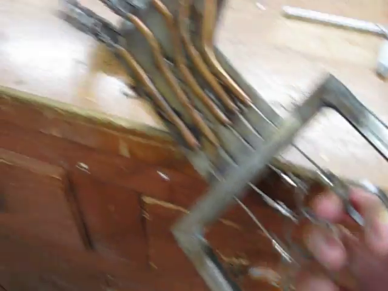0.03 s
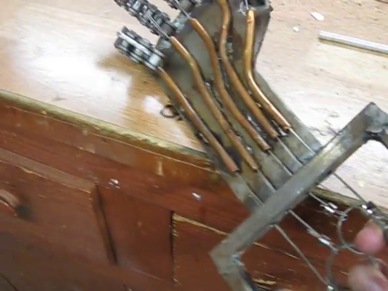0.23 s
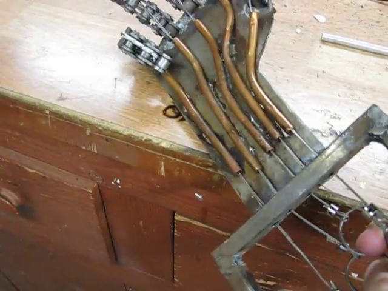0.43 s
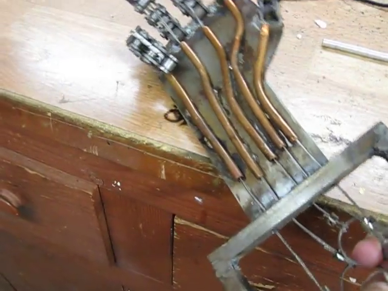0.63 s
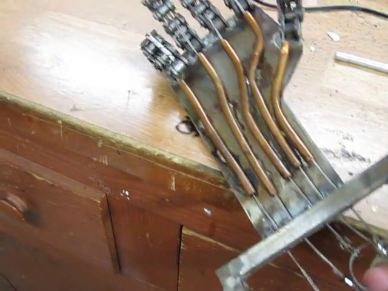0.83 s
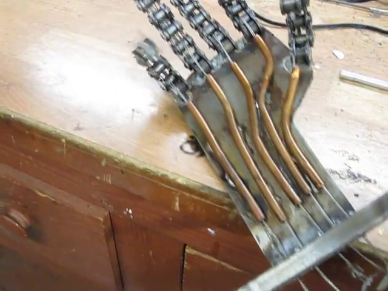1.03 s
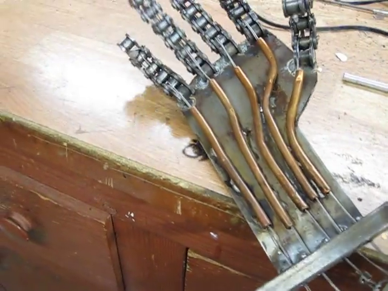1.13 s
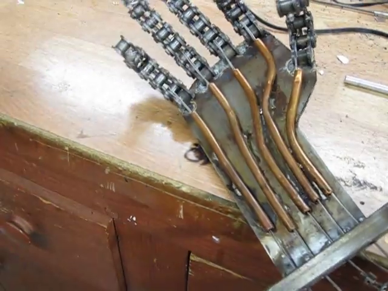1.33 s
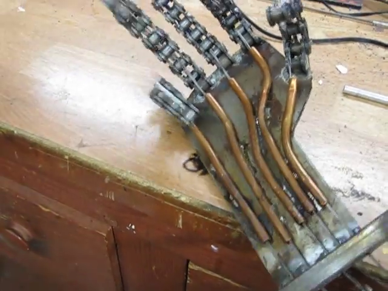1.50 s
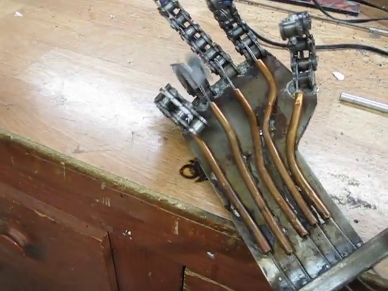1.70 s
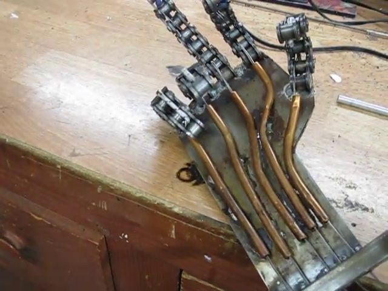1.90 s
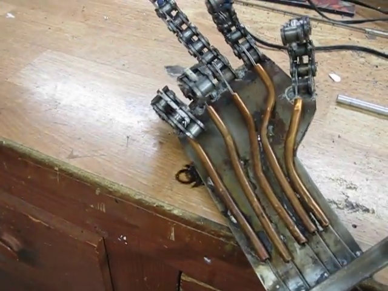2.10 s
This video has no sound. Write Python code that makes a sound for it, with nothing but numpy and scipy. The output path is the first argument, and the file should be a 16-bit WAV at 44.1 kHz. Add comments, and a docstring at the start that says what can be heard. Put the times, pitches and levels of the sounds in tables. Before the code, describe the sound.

Metal chain fingers of a mechanical hand snap sharply, then clack and tick as cables pull them. One drops on a wooden bench with a thump, followed by another ringing snap. Soft handling rumble, close by in a quiet room.

```python
"""Roller-chain fingers of a mechanical hand snap against their stops, ringing the steel hand.
Cables work them: each pull clacks on the steel frame, and the chains slide, tick and rasp.
One finger drops on the wooden bench below and makes it boom.
Handling rumbles softly underneath, in a quiet room."""
import sys
import numpy as np
from scipy import signal
from scipy.fft import rfft, irfft
from scipy.io import wavfile
from scipy.ndimage import uniform_filter1d

SR = 44100
rng = np.random.default_rng(int(sys.argv[2]) if len(sys.argv) > 2 else 0)


def unload_wav(signal):
    """Save mono or channel-first audio to the path in sys.argv[1] as 16-bit WAV at rate SR, clipped to [-1, 1]."""
    wavfile.write(
        sys.argv[1],
        SR,
        np.round(np.clip(np.atleast_2d(signal).T, -1, 1) * 32767).astype(np.int16),
    )


N = 94815
TIME = np.arange(N) / SR
RING_TIME = TIME[:SR // 2]
BASS_HZ, TREBLE_HZ = 910, 6070  # where the bass ends and the treble begins


def amp(db):
    """Turns decibels into a gain."""
    return 10 ** (np.asarray(db) / 20)

def unit(x):
    """Scales a sound to an average strength (rms) of 1."""
    return x / np.sqrt(np.mean(x ** 2) + 1e-20)

def read(points, hz):
    """Looks up a table's value at any frequency."""
    f, value = np.transpose(points)
    return np.interp(np.log(hz + 1), np.log(f), value)

def level(curve):
    """Turns rows of t/s, level/dB into a changing gain."""
    return amp(np.interp(TIME, *np.transpose(curve)))

def add(mix, s, sound):
    """Mixes a sound in at s seconds."""
    part = mix[max(round(s * SR), 0):][:len(sound)]
    part += sound[:len(part)]

def colour(x, points=(), bass_db=0, treble_db=0, peaks=(), size=8192):
    """Shapes the tone with a curve, bass and treble controls, and narrow peaks (f/Hz, height/dB)."""
    hz = abs(np.fft.fftfreq(size, 1 / SR))
    db = read(points, hz) if len(points) else 0
    db += bass_db / (1 + (hz / BASS_HZ) ** 2)
    db += treble_db * hz ** 2 / (hz ** 2 + TREBLE_HZ ** 2)
    for centre, height in peaks:
        octaves_away = np.log2((hz + 1) / centre)
        db += height / (1 + (octaves_away / 0.099) ** 2)
    response = np.exp(np.conj(signal.hilbert(np.log(amp(db)))))  # rings only after a hit
    taps = np.fft.ifft(response).real
    return signal.fftconvolve(x, taps[:size // 2])[:len(x)]

def noise(points):
    """Steady noise with the given tone."""
    return unit(colour(rng.standard_normal(N), points))

def fade(t60):
    """Dies away by 60 dB in t60 seconds, the fade time."""
    return np.exp(-np.log(1000) * RING_TIME / max(t60, .001))

def burst(t60):
    """Dense, quickly dying chatter, equally strong from low to high."""
    chatter = rng.choice([-1., 1.], len(RING_TIME)) * fade(t60)
    spectrum = rfft(chatter)
    bumps = np.sqrt(uniform_filter1d(abs(spectrum) ** 2, size=300) + 1e-12)
    even = irfft(spectrum / bumps, len(chatter)) * fade(10 * t60)
    return even / np.linalg.norm(even)

def grains(per_s, spread_db=6):
    """Tiny slips at random moments, a few of them large."""
    slips = (rng.random(N) < per_s / SR) * rng.choice([-1., 1.], N)
    return unit(slips * amp(spread_db * np.minimum(rng.exponential(1, N), 4)))

def ring(tones, bass_db=0, loose=True, rattle_hz=30, rattle_after_s=.008):
    """A struck part rings with its own tones; if it is loose, they soon waver and turn rough."""
    steps = rng.standard_normal((len(tones), len(RING_TIME))) * (RING_TIME > rattle_after_s)
    wander = loose * np.sqrt(2 * np.pi * rattle_hz / SR) * np.cumsum(steps, axis=1)
    out = np.zeros(len(RING_TIME))
    for k, (hz, db, t60) in enumerate(tones):
        sign = (-1) ** k if loose else 1
        gain = amp(db + bass_db / (1 + (hz / BASS_HZ) ** 2))
        out += sign * gain * fade(t60) * np.sin(2 * np.pi * hz * RING_TIME + wander[k])
    return out


# Tone of the handling rumble, the dragged-on bench and the air: f/Hz, level/dB
RUMBLE_TONE = [(15, 2), (45, 0), (80, -3.5), (250, -46)]
DRAG_TONE = [(40, -13.5), (95, -8.5), (138, -0.5), (185, -9), (300, -13.5), (1500, -52)]
AIR_TONE = [(18, -27.5), (30, -1.5), (106, -12), (461, -23), (800, -20), (1100, -28.5), (1960, -30),
            (4530, -44.5), (16000, -61.5)]
# How loud the handling and the dragging are: t/s, level/dB
RUMBLE_LEVELS = [(0, -44), (.075, -41.5), (.115, -63.5), (.6, -58), (.7, -52.5), (1.5, -51), (1.55, -70),
                 (2.15, -55)]
DRAG_LEVELS = [(0, -47), (.3, -65), (.72, -56.5), (.9, -51), (1.45, -49.5), (1.63, -61), (2.15, -61)]
def background(hum_hz=90.3, hum_start_s=1.69):
    """Handling rumbles, the bench murmurs as the hand drags, and a faint hum joins the room air."""
    rumble = noise(RUMBLE_TONE) * level(RUMBLE_LEVELS)
    drag = noise(DRAG_TONE) * level(DRAG_LEVELS)
    air = amp(-61) * noise(AIR_TONE)
    hum_fade_in = np.clip((TIME - hum_start_s) / 0.035, 0, 1)
    hum = amp(-58) * hum_fade_in * np.sin(2 * np.pi * hum_hz * TIME)
    return rumble + drag + air + hum

# How long the room echoes: f/Hz, fade time/s
ROOM_FADES = [(100, .35), (500, 0.45), (2000, .34), (15000, 0.25)]
def room(x, delay_s=0.0022):
    """Sound bounces off the bench, then leaves a faint echo whose treble dies first."""
    hz, t, spectrum = signal.stft(rng.standard_normal(len(RING_TIME)), SR, nperseg=256)
    decay = np.exp(-np.log(1000) * t / read(ROOM_FADES, hz)[:, None])
    tail = signal.istft(spectrum * decay, SR)[1]
    echo = np.zeros(SR)
    add(echo, delay_s, amp(-17) * burst(0.091))
    add(echo, 2 * delay_s, amp(-24.5) * tail / np.linalg.norm(tail))
    return x + signal.fftconvolve(x, echo)[:N]

# Thin metallic hiss of the links: t/s, level/dB
SING_LEVELS = [(0, -61.5), (.085, -40.5), (.13, -58.5), (.3, -75), (.42, -90)]
def singing(centre_hz=4713, half_width_hz=240):
    """Rubbing keeps the chain ringing around one high pitch, loudest at the first snap."""
    hz = np.fft.rfftfreq(N, 1 / SR)
    spectrum = rfft(rng.standard_normal(N)) / (1 + ((hz - centre_hz) / half_width_hz) ** 4)
    return unit(irfft(spectrum, N)) * level(SING_LEVELS)

# Cable slips: middle t/s, half length/s, level/dB
CABLE_SLIPS = [(0.89, 0.013, -54), (1.073, 0.026, -51.5), (1.371, .008, -51.5)]
# Their tone: f/Hz, level/dB
RASP_TONE = [(1500, -20.5), (5000, 1.5), (9500, -11.5), (13500, -14), (16000, -17)]
def rasps():
    """Short swells of bright grit as a cable slips through its guide."""
    swell = sum(amp(db) * np.exp(-((TIME - s) / half) ** 2) for s, half, db in CABLE_SLIPS)
    return unit(colour(grains(per_s=3000), RASP_TONE)) * swell

# Chains and cables sliding: t/s, level/dB
SLIDE_LEVELS = [(0, -53), (.04, -45), (.077, -39.5), (.095, -51), (.25, -64), (.64, -63), (.84, -59.5),
                (.885, -54.5), (.93, -57), (1.01, -55), (1.10, -45), (1.135, -42), (1.22, -58), (1.45, -55),
                (1.485, -46), (1.515, -34), (1.54, -41.5), (1.65, -56.5), (1.78, -56.5), (1.83, -69),
                (2.15, -63.5)]
# Their tone: f/Hz, level/dB
SLIDE_TONE = [(150, 2.5), (700, 4.5), (1500, 2.5), (2800, 3.5), (3800, -3), (5000, -2.5), (8000, -10),
              (11000, -16), (13500, -23.5), (15500, -36)]
def sliding(grit_share=0.12):
    """Rubbing makes fine grit and hiss that swell as a finger speeds towards its stop."""
    grit = np.sqrt(grit_share) * grains(per_s=5400)
    hiss = np.sqrt(1 - grit_share) * rng.standard_normal(N)
    return unit(colour(grit + hiss, SLIDE_TONE)) * level(SLIDE_LEVELS)

# Link ticks: t/s, level/dB, treble/dB, fade time/s, lower peak f/Hz, upper peak f/Hz, peak height/dB
LINK_TICKS = [(0.0273, -1, -2.5, 0.017, 1700, 8000, 12), (0.4663, -4, -2.5, 0.027, 1790, 6400, 7.5),
              (0.479, -12, -1, 0.032, 1750, 6600, 10), (0.591, -16.5, 4, 0.026, 3500, 6300, 14),
              (0.6887, -12.5, 1.5, .03, 2560, 4540, 7.5), (0.724, -12, -7, 0.029, 2620, 4460, 6),
              (0.7528, -10.5, -1.5, 0.043, 2470, 10300, 18.5), (0.7554, -7.5, 4, 0.021, 3280, 4350, 16.5),
              (0.7913, -8.5, -18, 0.012, 3640, 4300, 16.5), (1.349, -10, -11.5, 0.0048, 3500, 4300, 15.5),
              (1.6707, 1.5, 4.5, 0.023, 6900, 8430, 8.5)]
# Their tone: f/Hz, level/dB
TICK_TONE = [(300, -24), (1200, -16), (2000, -11), (4200, -17.5), (8000, -18), (15000, -28.5)]
def ticks():
    """Single links settle with small bright clinks, each ringing at two pitches."""
    out = np.zeros(N)
    for s, db, treble_db, t60, lower_hz, upper_hz, peak_db in LINK_TICKS:
        peaks = [(lower_hz, peak_db), (upper_hz, peak_db)]
        add(out, s, amp(db) * colour(burst(t60), TICK_TONE, treble_db=treble_db, peaks=peaks))
    return out

# Faint ringing of the links after a hit: f/Hz, level/dB, fade time/s
LINK_RING = [(2550, -45, 0.14), (3162, -46.5, 0.28), (4930, -45, 0.31), (6100, -45, 0.22), (7740, -46, .21)]
def shimmer(count=16, pitch_spread=.04):
    """Many nearly equal links ring together, each slightly off pitch."""
    detunes, phases = rng.uniform(-1, 1, (2, len(LINK_RING), count, 1))
    out = np.zeros(len(RING_TIME))
    for (hz, db, t60), detune, phase in zip(LINK_RING, detunes, phases):
        links = np.sin(2 * np.pi * hz * (1 + pitch_spread * detune) * RING_TIME + np.pi * phase)
        out += amp(db) * fade(t60) * links.sum(0)
    return out / np.sqrt(count)

# Clacks on the frame; "bite" is a high peak in the tone and "body" a lower one:
# t/s, level/dB, treble/dB, bite f/Hz, bite/dB, body f/Hz, body/dB
CABLE_CLACKS = [(0.3854, 1.5, -12, 2640, -6, 800, 7), (0.4907, -0.5, -5.5, 3340, 1, 1310, 4.5),
                (1.6924, -8.5, -15.5, 2840, -9, 740, 12)]
# Tone of the knock: f/Hz, level/dB
KNOCK_TONE = [(200, -46), (1000, -10), (2500, -5), (5500, -10), (8000, -17.5), (15000, -31)]
# Ringing of the steel frame: f/Hz, level/dB, fade time/s
FRAME_RING = [(337, -57.5, 0.077), (548, -57, 0.1), (717, -48, 0.032), (892, -53.5, 0.077),
              (1307, -52, 0.1), (1758, -31, 0.03), (2626, -27.5, 0.015), (3290, -32, 0.015),
              (5830, -37, 0.024)]
def cable_pulls():
    """Each pull knocks a different spot on the frame, which rings hollowly and stirs the chain."""
    out = np.zeros(N)
    for s, db, treble_db, bite_hz, bite_db, body_hz, body_db in CABLE_CLACKS:
        knock = colour(burst(t60=0.011), KNOCK_TONE, treble_db=treble_db)
        frame = ring(FRAME_RING, bass_db=-treble_db)
        clack = colour(knock + frame, peaks=[(bite_hz, bite_db), (body_hz, body_db)])
        add(out, s, amp(db) * (clack + amp(-21) * shimmer()))
    return out

# Blows that reach the bench: t/s, level/dB
BENCH_BLOWS = [(0.082, -22.5), (1.121, 0), (1.165, -6), (1.517, -14.5)]
# Ringing of the wood: f/Hz, level/dB, fade time/s
BENCH_RING = [(93.7, -27.5, 0.26), (146, -19, 0.18), (259, -38.5, 0.11), (363, -40.5, 0.1),
              (462, -38.5, 0.3)]
def bench(low_cut_hz=60):
    """The bench booms under the heavier blows and one bounce, but gives off little very deep bass."""
    out = np.zeros(N)
    soft_start = np.minimum(RING_TIME / .003, 1)  # the wood gives way under the blow
    for s, db in BENCH_BLOWS:
        add(out, s, amp(db) * ring(BENCH_RING, loose=False) * soft_start)
    return signal.lfilter(*signal.butter(2, low_cut_hz, "high", fs=SR), out)

def crack(t60, split_hz=5000):
    """Links collide in a low burst and a high burst that fade together."""
    low = signal.lfilter(*signal.butter(4, split_hz, "low", fs=SR), burst(t60))
    high = signal.lfilter(*signal.butter(4, split_hz, "high", fs=SR), burst(t60))
    return low + high

# Fingers hitting a stop: t/s, level/dB, bass/dB, treble/dB, hand ring/dB, crack fade time/s,
# bite f/Hz, bite/dB, link shimmer/dB, body f/Hz, body/dB
FINGER_SNAPS = [(0.0801, 1, -8, 1.5, -2.5, 0.0062, 4396, 11.5, -21.5, 970, 4),
                (1.1139, -12.5, 9, -1.5, -1, 0.031, 2250, -5.5, -18.5, 782, 3.5),
                (1.1172, -11, 15.5, -21, -3, 0.058, 2700, 7.5, -12, 1040, -25),
                (1.517, -2, 1, 4, 1.5, 0.01, 3610, 9.5, 5, 1240, 1.5),
                (1.7435, -24.5, 8, -3, -1.5, 0.0071, 5400, 7.5, 8, 1003, 12.5),
                (1.7757, -34.5, 14, -8, -1, 0.013, 1810, 10.5, -11.5, 1000, 2)]
# Tone of the crack: f/Hz, level/dB
CRACK_TONE = [(100, -2.5), (500, 6.5), (900, 14), (1900, 19.5), (3800, 15), (6000, 14.5), (8200, 15),
              (11000, 6.5), (15000, -0.5)]
# Ringing of the steel hand: f/Hz, level/dB, fade time/s
HAND_RING = [(283, -29.5, 0.13), (408.5, -32, 0.13), (607.3, -29.5, .06), (747.5, -17, 0.05),
             (1017, -25, 0.06), (1235, -29.5, 0.045), (1650, -24.5, 0.052), (2257, -13.5, 0.024),
             (2766, -7, 0.017), (3406, -12.5, 0.015), (3896, -20.5, 0.02), (4690, -16, 0.012),
             (5520, -34.5, 0.062), (7935, -25, 0.021), (8390, -27, 0.029)]
def fingers():
    """Each snap cracks, rings the hand and shakes the chain; where it lands sets its bite and body."""
    out = np.zeros(N)
    for (s, db, bass_db, treble_db, ring_db, t60,
         bite_hz, bite_db, links_db, body_hz, body_db) in FINGER_SNAPS:
        hit = colour(crack(t60), CRACK_TONE, bass_db, treble_db)
        hand = amp(ring_db) * ring(HAND_RING, bass_db)
        snap = colour(hit + hand, peaks=[(bite_hz, bite_db), (body_hz, body_db)])
        add(out, s, amp(db) * (snap + amp(links_db) * shimmer()))
    return out


def scene():
    """The hand in its room, as one channel."""
    hand = fingers() + bench() + cable_pulls() + ticks() + sliding() + rasps() + singing()
    return (room(hand) + background())[None]

def record(dry, ceiling=.82, top_hz=15700):
    """Rounds off the loudest snaps and removes the very highest treble."""
    soft = dry / (1 + (dry / ceiling) ** 4) ** .25
    low_pass = signal.firwin(201, top_hz, window=("kaiser", 9), fs=SR)
    return signal.oaconvolve(soft, low_pass[None], "same")


dry = scene()
out = record(dry)
unload_wav(out)
```